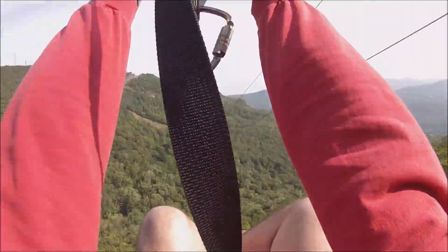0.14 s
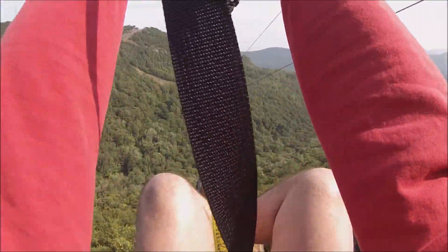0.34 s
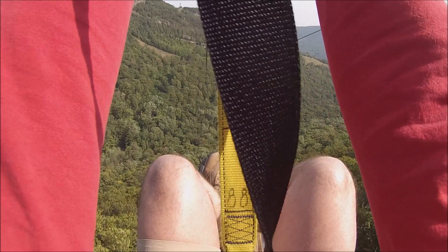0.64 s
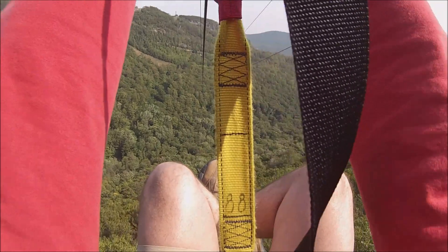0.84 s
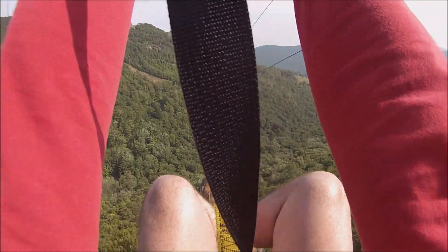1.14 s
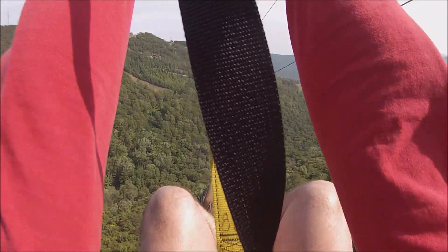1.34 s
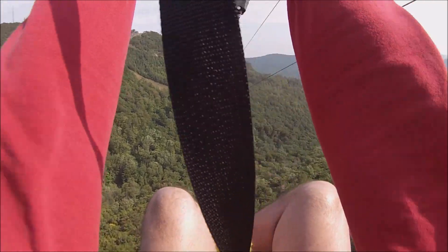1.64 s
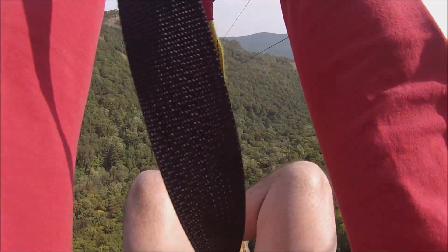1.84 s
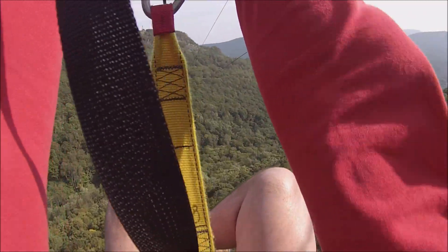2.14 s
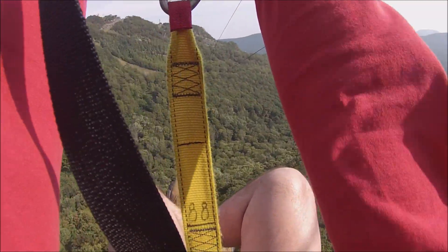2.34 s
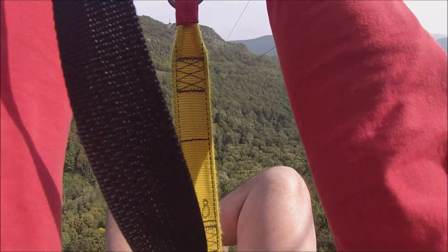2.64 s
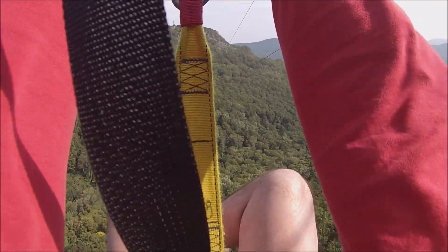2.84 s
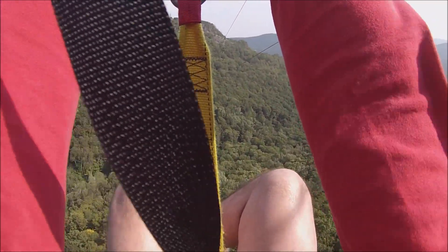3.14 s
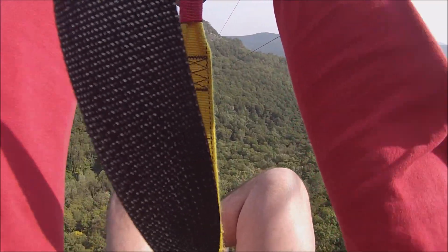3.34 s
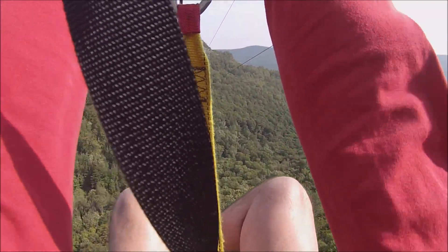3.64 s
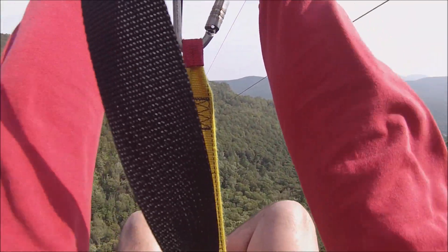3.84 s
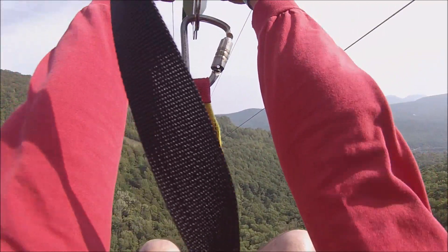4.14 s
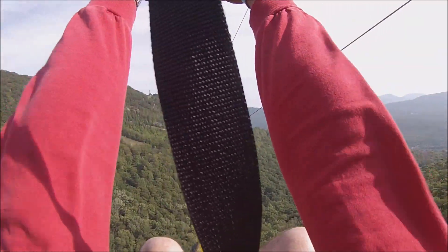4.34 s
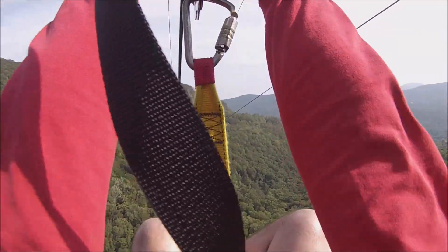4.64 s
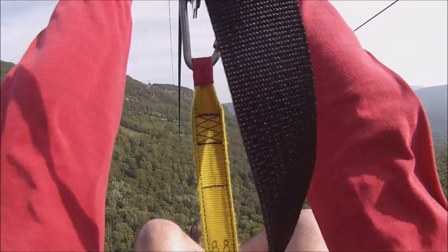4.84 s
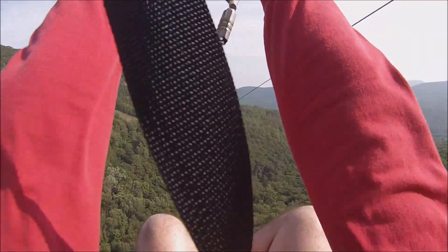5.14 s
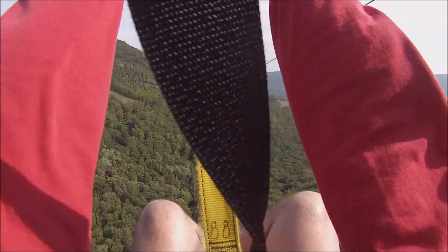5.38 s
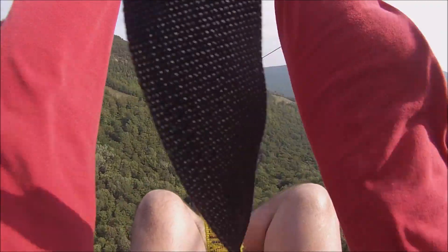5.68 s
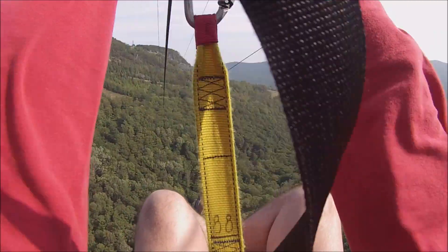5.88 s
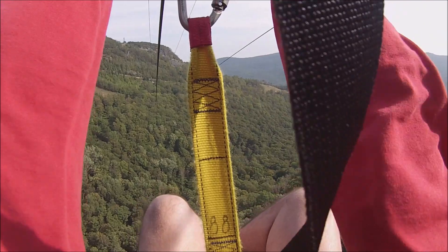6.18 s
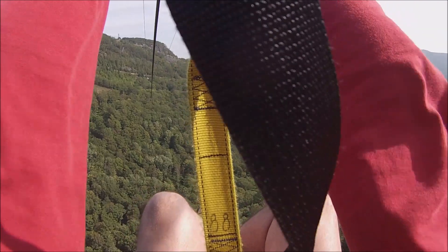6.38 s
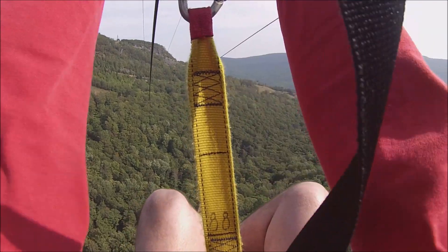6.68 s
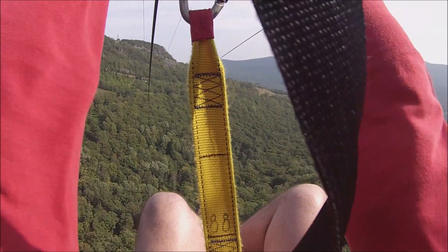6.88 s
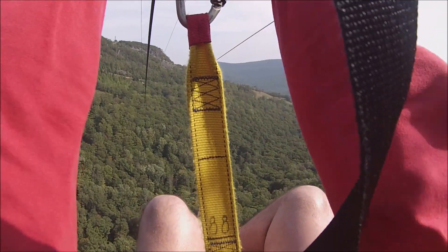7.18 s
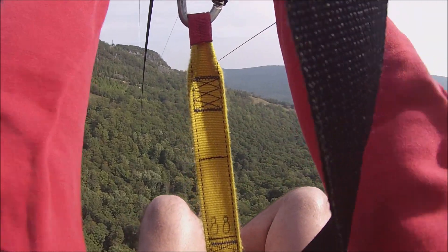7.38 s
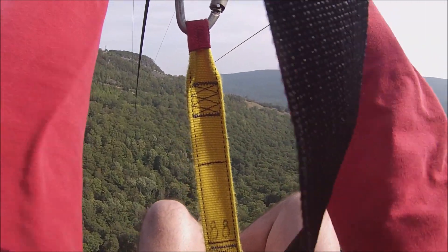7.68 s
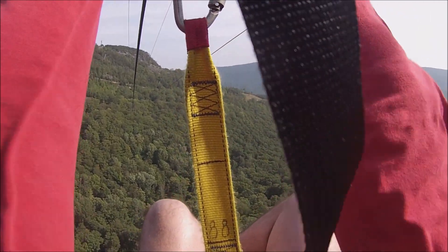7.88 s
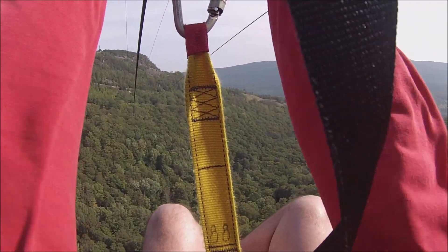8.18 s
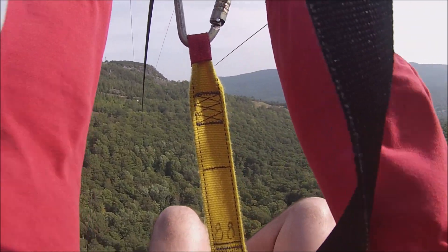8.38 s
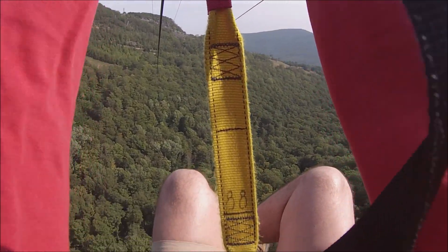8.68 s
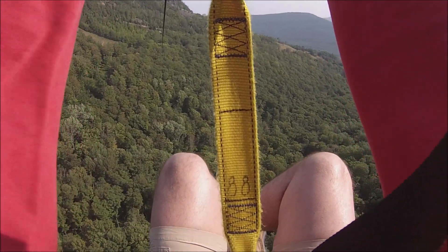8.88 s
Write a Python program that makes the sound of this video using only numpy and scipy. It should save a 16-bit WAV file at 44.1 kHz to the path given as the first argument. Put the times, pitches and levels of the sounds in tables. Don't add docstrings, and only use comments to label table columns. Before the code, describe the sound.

Zipline ride: a steady rough metallic sizzle and climbing whine of wheels on cable, with low wind rumble and breathy hooting gusts.

```python
import sys
import numpy as np
from scipy import signal
from scipy.fft import rfft, irfft, dct, next_fast_len
from scipy.io import wavfile
from scipy.ndimage import uniform_filter1d, map_coordinates

SR = 44100
rng = np.random.default_rng(int(sys.argv[2]) if len(sys.argv) > 2 else 0)


def makeup_ratio(level_db):
    decades = np.asarray(level_db, float) / 20
    return 10 ** decades


def generate_wav(signal):
    frames = np.transpose(np.atleast_2d(signal))
    scaled = np.clip(frames, -1, 1) * 32767
    pcm = np.round(scaled).astype(np.int16)
    wavfile.write(sys.argv[1], SR, pcm)


N = 397782

# time in seconds, whine (twelfth order of the strand twist) in Hz.
RIDE_SPEED = [(0, 1246), (1.5, 1490), (2.4, 1617), (3.2, 1718), (3.7, 1765), (4.0, 1811), (4.15, 1820),
              (4.45, 1861), (4.65, 1872), (4.9, 1915), (5.2, 1942), (5.4, 1943), (6.0, 2009), (6.2, 2012),
              (7.0, 2082), (7.35, 2085), (7.65, 2122), (9.02, 2185)]
# frequency in Hz, half width in
# Hz, level in dB.
HOWL_MODES = [(1645.5, 68.8, -2.5), (1798, 76, -4), (1890.7, 75.4, 1.5), (2132, 77, -17)]
MIDDLE_MODES = [(2412, 106, 1), (2856, 135, 2), (3143, 170, -0.5), (3560, 210, -5)]
SIZZLE_MODES = [(3873, 73, -6), (4027, 110, -3.5), (4260, 170, -6.5), (4583, 155, -4), (4930, 175, 0.5),
                (5250, 174, -6)]
HISS_MODES = [(5846, 110, -3), (5630, 81, -4.5), (6268, 174, 1), (6485, 110, -3), (7056, 210, -3.5),
              (7453, 250, -5), (8080, 430, -13.5)]


def unit(x):
    return x / np.sqrt(np.mean(x ** 2) + 1e-20)


def curves(rows):
    s, *columns = np.transpose(rows)
    return [np.interp(np.arange(N) / SR, s, column) for column in columns]


def wobble(rate):
    knots = rng.standard_normal(int(N * rate / SR) + 4)
    return map_coordinates(knots, [np.arange(N) * rate / SR])


def bumps(rows):
    t = np.arange(N) / SR
    return sum(db * np.exp(-((t - s) / half) ** 2) for s, db, half in rows)


def filtered(x, gain):
    m = next_fast_len(N + 8192)
    return irfft(rfft(x, m) * gain(np.fft.rfftfreq(m, 1 / SR)), m)[:N]


def modes(table, steep):
    def gain(f):
        return np.sqrt(sum(makeup_ratio(2 * db) / (1 + ((f - hz) / w) ** 2) ** steep for hz, w, db in table))
    return gain


def shape(points):
    hz, db = np.transpose(points)
    return lambda f: makeup_ratio(np.interp(np.log(f + 1), np.log(hz), db))


def noise(gain, patchy_db, span):
    z = signal.stft(rng.standard_normal(N + 512), nperseg=512)[2]
    across_hz = uniform_filter1d(rng.standard_normal(z.shape), 5, 0)
    patches = unit(uniform_filter1d(across_hz, span, 1))
    patchy = signal.istft(z * makeup_ratio(patchy_db * patches), nperseg=512)[1][:N]
    return unit(filtered(patchy, gain))


def wind():
    # time in seconds, airflow in dB.
    airflow = [(0, -60), (.45, -64), (.85, -52), (1.3, -49.5), (1.6, -50), (1.8, -43.5), (2.5, -39),
               (2.75, -43), (3.1, -41), (3.6, -42), (4.0, -44.5), (4.5, -48.5), (5.0, -43.5), (5.75, -38),
               (6.5, -43.5), (7.0, -38.5), (7.6, -41), (9.02, -38)]
    # time in seconds, change in dB, half length in seconds.
    eddies = [(1.307, 8.5, 0.14), (2.298, 3, 0.12), (2.46, -5, .04), (2.542, 3, .04), (3.0, 5, 0.12),
              (3.62, 4, .08), (4.113, 4.5, 0.11), (4.603, 6.5, 0.061), (4.82, -8, 0.026), (4.925, 4, .03),
              (4.98, -12, .03), (5.22, -8, 0.037), (5.27, 8, .03), (5.454, -3, 0.19), (5.7, -13, 0.077),
              (6.2, 4.5, .1), (7.54, -4, .05), (7.678, -7, .04), (8.27, 5, 0.028), (8.34, -7, 0.054),
              (8.598, 3, .08), (8.746, -2, 0.046), (8.932, 2, .06)]
    # time in seconds, change in dB, half length in seconds.
    slaps = [(.7, 0.5, 0.11), (2.5, -2.5, 0.57), (3.5, 1, 0.27), (4.15, 1.5, 0.12), (4.92, 4.5, 0.057),
             (5.27, 3, 0.056), (5.75, 3, .1), (6.55, -2.5, .12), (6.98, 2.5, 0.064), (7.16, -5, 0.044),
             (7.44, 5, .04), (8.25, -6, 0.13), (8.73, 3, 0.087), (9.0, 3.5, 0.044)]
    # frequency in Hz, density in dB per Hz.
    buffet_colour = [(8, -45), (20, -14), (32, -6.5), (47, 1.5), (62, -2), (82, -6), (120, -11.5),
                     (200, -13), (310, -21.5), (500, -24.5), (900, -120)]
    rush_colour = [(120, -40), (300, 1), (600, 3), (1000, 3), (1200, -1), (1450, 0.5), (2600, -5.5),
                   (4000, -20), (9000, -13), (15000, -36), (16000, -90)]
    # frequency in Hz, half width in Hz, level in dB.
    cavity_modes = [(796, 28.3, 9.5), (794, 150, -27.5)]

    usual_flow_db = -42
    flow_db = curves(airflow)[0] - usual_flow_db
    eddy_db, slap_db = bumps(eddies), bumps(slaps)
    buffet_db = -29 + 0.84 * flow_db + 0.076 * eddy_db + slap_db + 0.97 * wobble(9)
    cavity_db = -33 + 1.25 * flow_db + eddy_db
    rush_db = usual_flow_db + flow_db + 0.2 * eddy_db + 0.45 * slap_db + 1.4 * wobble(11)

    gust = wobble(16)
    buffet = noise(shape(buffet_colour), patchy_db=1.0, span=8)
    cavity = noise(modes(cavity_modes, steep=1.39), patchy_db=1.83, span=8)
    rush = noise(shape(rush_colour), patchy_db=0.5, span=12)
    return (makeup_ratio(buffet_db + 0.54 * gust) * buffet
            + makeup_ratio(cavity_db + 0.99 * gust + 0.88 * wobble(24)) * cavity
            + makeup_ratio(rush_db + 5.5 + 0.57 * gust) * rush)


def rolling():
    # time in seconds, load on the wheels in dB, grit under them in dB, camera tipped up in dB.
    roll = [(0, -19, -4.5, 1), (.4, -18, 1, -0.5), (1.0, -16, 1.5, -0.5), (1.85, -19, -2, 0),
            (2.4, -17.5, 3.5, -1), (2.75, -18.5, 0, -1), (3.05, -19.5, 3.5, -1.5), (3.3, -18, -1.5, -2),
            (3.6, -20, 0, -2), (3.85, -19.5, -4, -1.5), (4.2, -21, -1.5, 1.5), (4.6, -24, -5, 0.5),
            (5.0, -20.5, -1, 1.3), (6.15, -16.5, .5, 0), (6.8, -17, 1.5, 0.5), (7.15, -20, 1, -.5),
            (7.8, -18.5, 3.5, 1), (9.02, -17, 0.5, -1)]
    # frequency in Hz, half width in Hz, level in dB.
    top_modes = [(8960, 68, 6.5), (9680, 560, -2), (10450, 530, 2.5), (11110, 120, 0), (11960, 300, -6.5),
                 (12750, 300, -6), (13300, 330, -4), (14500, 250, -9.5), (14800, 260, -15)]

    (howl_db, grit_db, tip_db), (whine_hz,) = curves(roll), curves(RIDE_SPEED)
    faster_khz = (whine_hz - whine_hz.mean()) / 1000
    sizzle_db = -22.5 - 4.5 * faster_khz + 0.17 * grit_db + tip_db + 0.32 * wobble(4)
    hiss_db = -23 + grit_db
    top_db = -36.5 + 0.37 * grit_db - 0.85 * tip_db + 0.45 * wobble(3.3)
    pin_db = top_db - 11.5 - 1.7 * tip_db
    middle_db = np.mean([howl_db, sizzle_db, hiss_db, top_db], axis=0) - 6.5

    grip = wobble(12) + 1.0 * wobble(30)
    howl = noise(modes(HOWL_MODES, steep=2.26), patchy_db=-1.0, span=30)
    middle = noise(modes(MIDDLE_MODES, steep=1.78), patchy_db=1.4, span=40)
    sizzle = noise(modes(SIZZLE_MODES, steep=2.6), patchy_db=0.4, span=60)
    hiss = noise(modes(HISS_MODES, steep=2.26), patchy_db=1.0, span=60)
    top = noise(modes(top_modes[1:], steep=2.45), patchy_db=2.1, span=30)
    pin = noise(modes(top_modes[:1], steep=2.5), patchy_db=2.0, span=30)
    return (makeup_ratio(howl_db) * howl
            + makeup_ratio(middle_db) * middle
            + makeup_ratio(sizzle_db + 0.31 * grip) * sizzle
            + makeup_ratio(hiss_db + 0.45 * grip) * hiss
            + makeup_ratio(top_db + 0.22 * grip) * top
            + makeup_ratio(pin_db) * pin)


def strands():
    # time in seconds, whine in dB rms.
    bite = [(0, -47), (.9, -55), (1.7, -28), (2.0, -28), (2.35, -46), (2.6, -24), (3.3, -32), (3.65, -21.5),
            (4.15, -14.5), (4.95, -16), (5.1, -21), (5.3, -18.5), (6.15, -24.5), (6.4, -35), (6.8, -28.5),
            (7.6, -45), (8.1, -32), (9.02, -38)]
    faint_orders = [7, 15, 16, 17, 19, 23, 24, 25, 26, 29, 39.84, 45.85]
    faint_levels = [-38, -38, -39, -32, -35, -35, -33, -34, -37, -39, -30, -31]
    near_orders = [6, 11, 13, 14, 18]
    near_levels = [-29.5, -24.5, -24, -32, -21.5]
    group_levels = [-0.5, -17.5, -4.5, -5]
    # frequency in Hz, half width in Hz, level in dB.
    bracket = [(640, 30, -31), (690, 30, -22), (820, 24, -10), (1024, 18, -14), (1062, 24, -14)]

    (whine_hz,), (whine_db,) = curves(RIDE_SPEED), curves(bite)
    twist = 2 * np.pi * np.cumsum(whine_hz / 12) / SR + 0.02 * wobble(25)
    slip = 0.035 * wobble(18)

    def line(order, db, slipping=0):
        phase = order * (twist + slipping) + 2 * np.pi * rng.random()
        return np.sqrt(2) * makeup_ratio(db) * np.sin(phase)

    faint = sum(line(order, db + 4.5 * wobble(5), slip)
                for order, db in zip(faint_orders, faint_levels))
    near = sum(line(order, db + 1.5 * wobble(4) + 0.65 * wobble(6.6))
               for order, db in zip(near_orders, near_levels))

    groups = zip([HOWL_MODES, MIDDLE_MODES, SIZZLE_MODES, HISS_MODES], group_levels)
    frame = [(hz, w, db + group_db) for table, group_db in groups for hz, w, db in table]
    rung_faint = filtered(faint, modes(frame, steep=2.2))
    rung_near = filtered(near, modes(frame + bracket, steep=2.8))
    whine = line(12, whine_db + 0.77 * wobble(15))
    return whine + rung_faint + rung_near


def scene():
    return np.tile(wind() + rolling() + strands(), (2, 1))


def thin_out(x):
    # time in seconds, level in dB under which partials are lost.
    thin_moments = [(1.264, -46), (1.754, -48), (2.544, -43), (3.888, -46), (4.228, -45), (4.462, -45),
                    (4.57, -44), (4.634, -44), (4.718, -43), (4.804, -44), (5.231, -44), (7.173, -46),
                    (7.3, -46), (8.707, -41)]
    size = 1880
    out, window = x.copy(), np.sin(np.pi * (np.arange(size) + 0.5) / size)
    tilt_db = np.linspace(3, -9, size)
    for s, keep_db in thin_moments:
        centre = round(s * SR)
        at = slice(centre - size // 2, centre + size // 2)
        bins = dct(x[at] * window, type=4, norm="ortho")
        strength = np.abs(bins) / (np.sqrt(size / 4) * makeup_ratio(keep_db + tilt_db))
        lost = dct(bins / (1 + strength ** 8), type=4, norm="ortho")
        out[at] -= 0.91 * lost * window ** 2
    return out


def wide_flickers(x):
    # time in seconds, low edge in Hz, high edge in Hz.
    flickers = [(2.5704, 6500, 8600), (2.5704, 10200, 12700), (5.5658, 4500, 7800), (5.5658, 8200, 12000),
                (6.7964, 8900, 11300), (7.5394, 5500, 7800), (7.5394, 8200, 10000), (7.8413, 12300, 14000)]
    size = 2048
    side, window = np.zeros(N), np.sin(np.pi * (np.arange(size) + 0.5) / size)
    hz = np.fft.rfftfreq(size, 1 / SR)
    for s, low_hz, high_hz in flickers:
        centre = round(s * SR)
        at = slice(centre - size // 2, centre + size // 2)
        chance = np.exp(2j * np.pi * rng.random(len(hz)))
        bins = rfft(x[at] * window) * chance * (hz > low_hz) * (hz < high_hz)
        side[at] += 0.85 * irfft(bins) * window
    return side


def band_limit(x):
    return signal.sosfilt(signal.butter(12, 15440, fs=SR, output="sos"), x)


def record(dry):
    held = dry[0] / (1 + np.abs(dry[0] / 0.82) ** 12) ** (1 / 12)
    mid = thin_out(filtered(held, lambda hz: hz < 15285))
    side = wide_flickers(mid)
    return band_limit(np.array([mid + side, mid - side]))


dry = scene()
out = record(dry)
generate_wav(out)
```